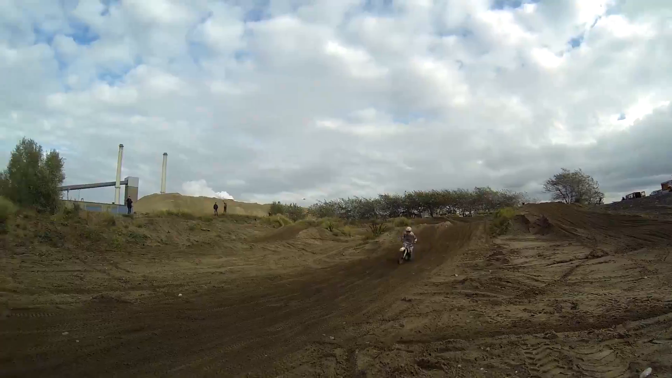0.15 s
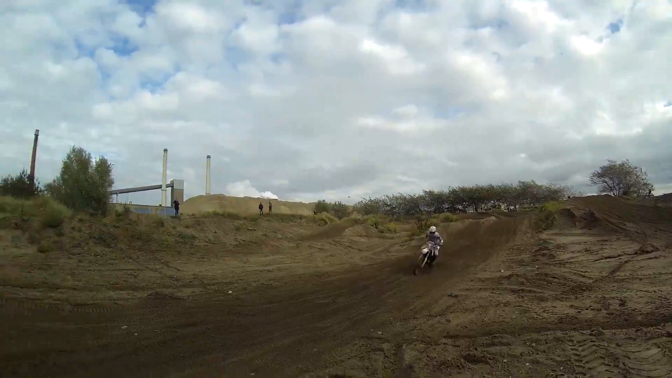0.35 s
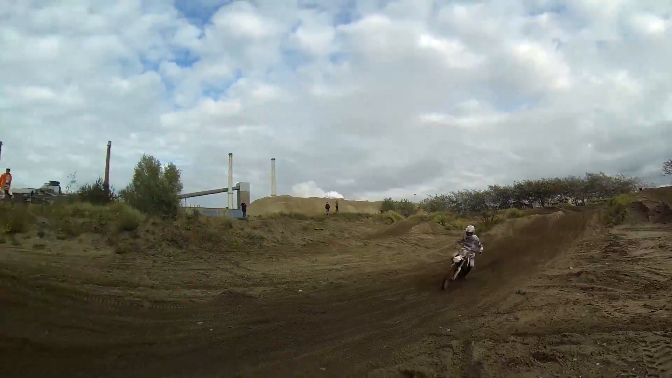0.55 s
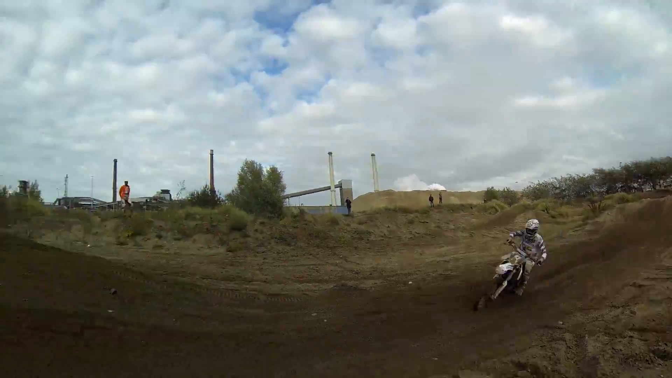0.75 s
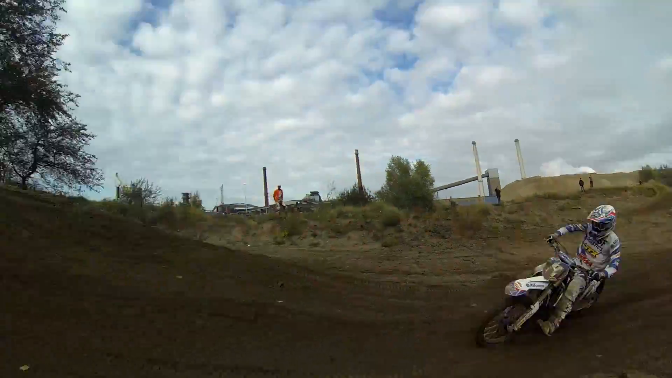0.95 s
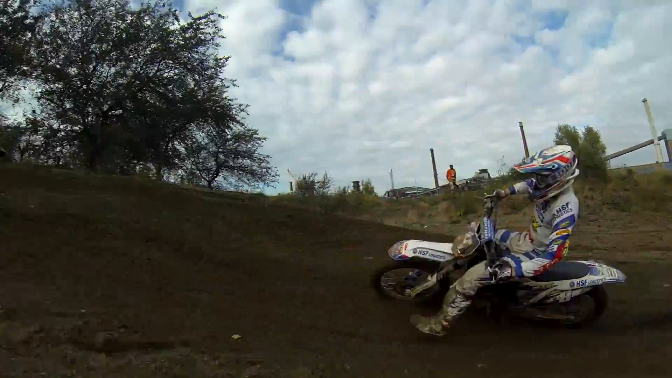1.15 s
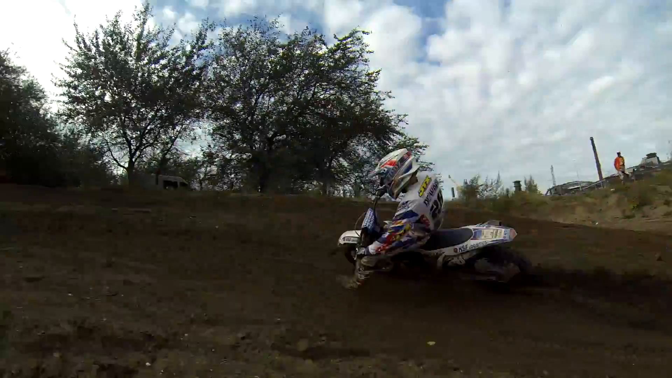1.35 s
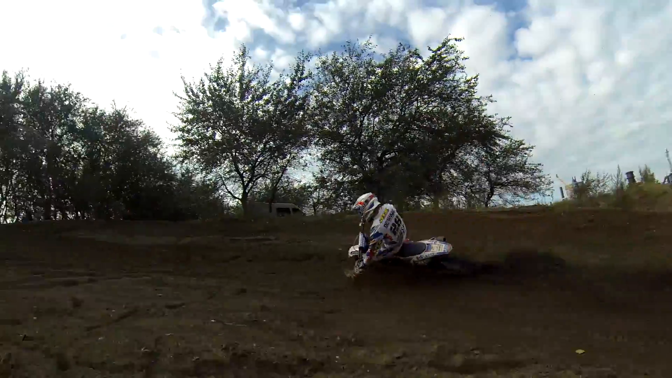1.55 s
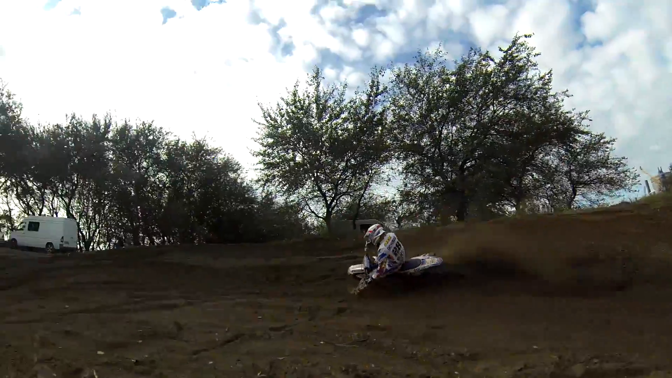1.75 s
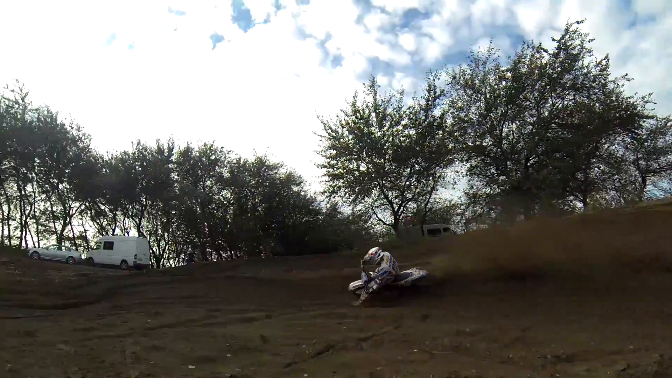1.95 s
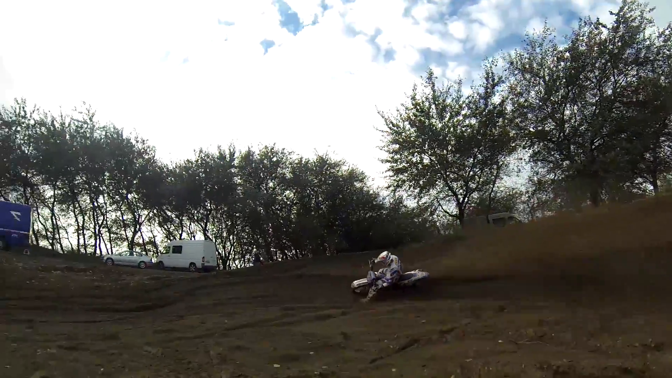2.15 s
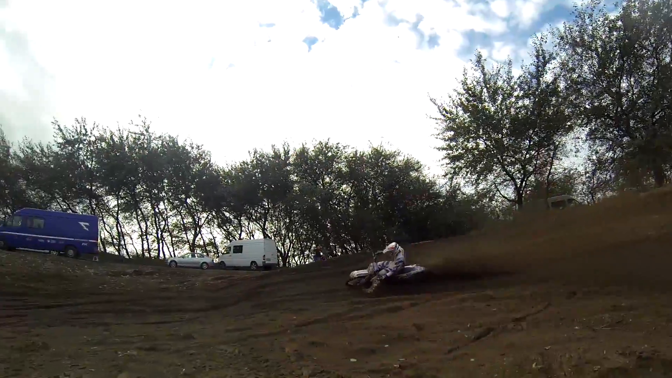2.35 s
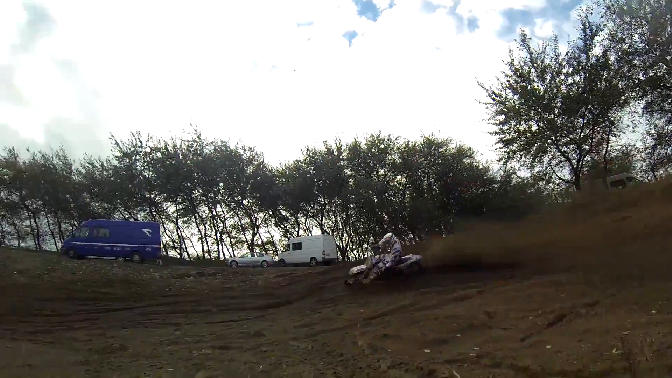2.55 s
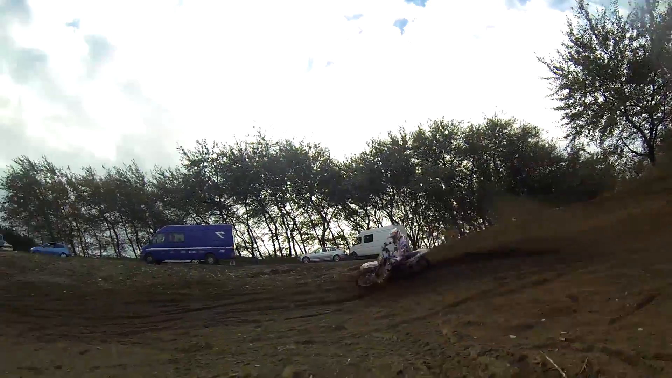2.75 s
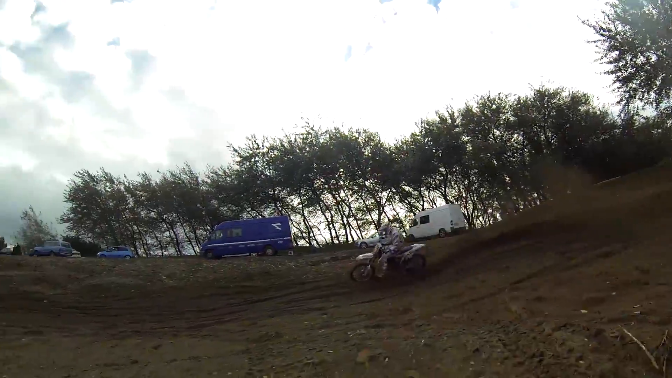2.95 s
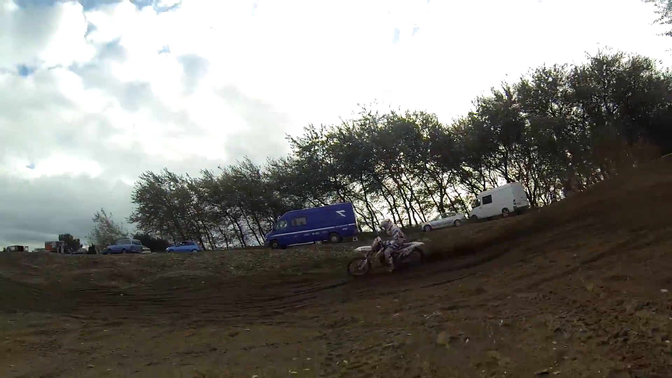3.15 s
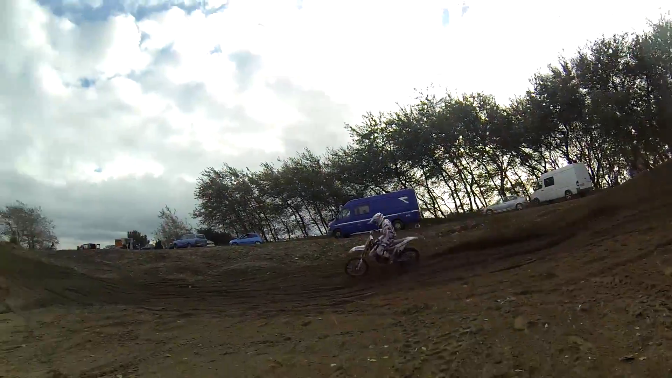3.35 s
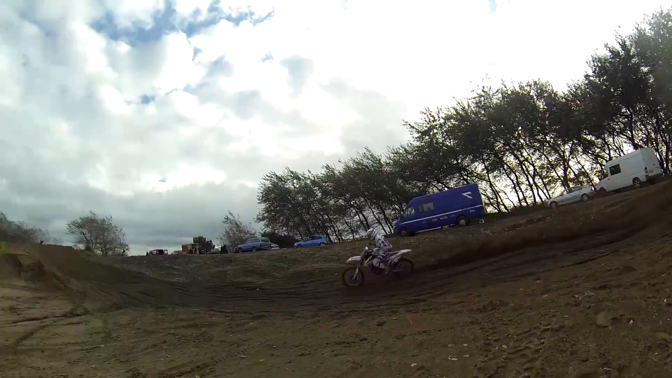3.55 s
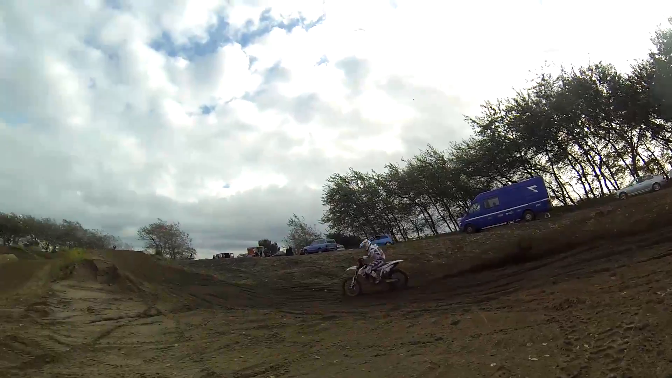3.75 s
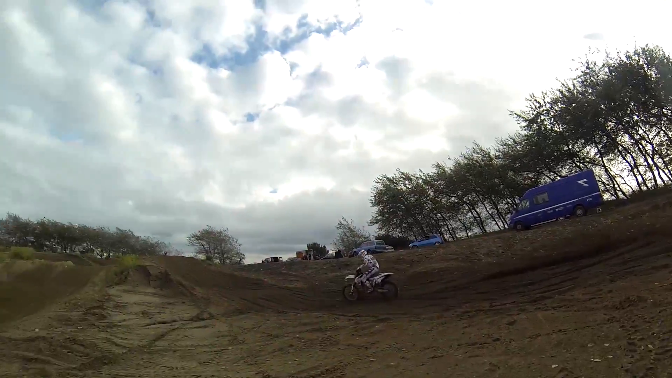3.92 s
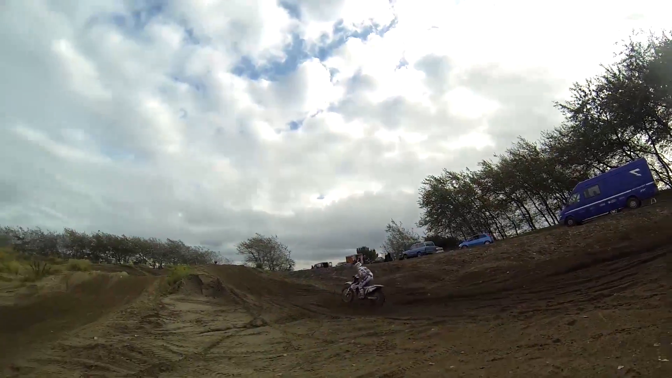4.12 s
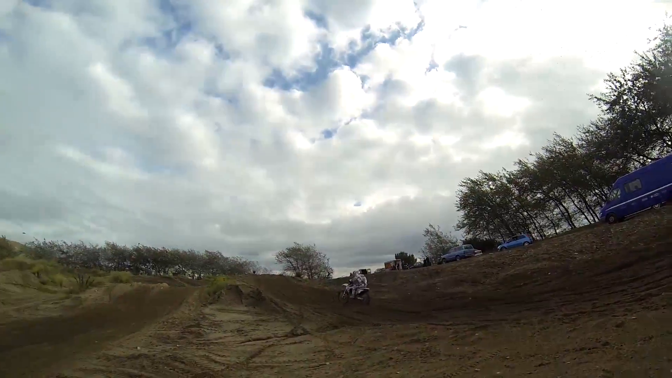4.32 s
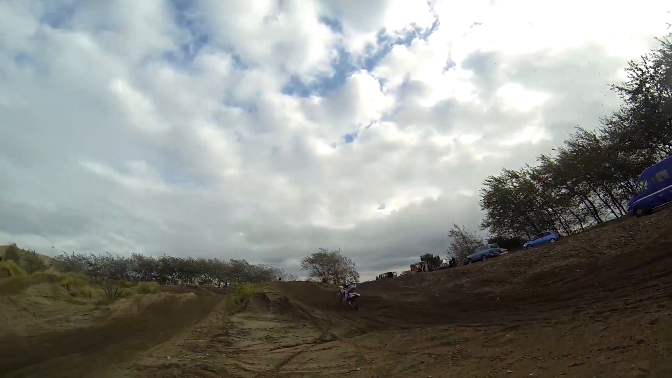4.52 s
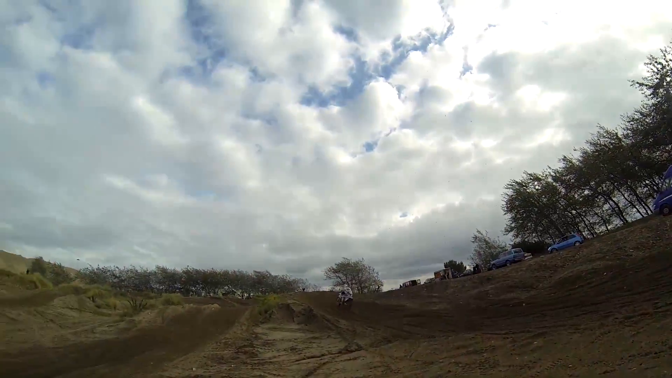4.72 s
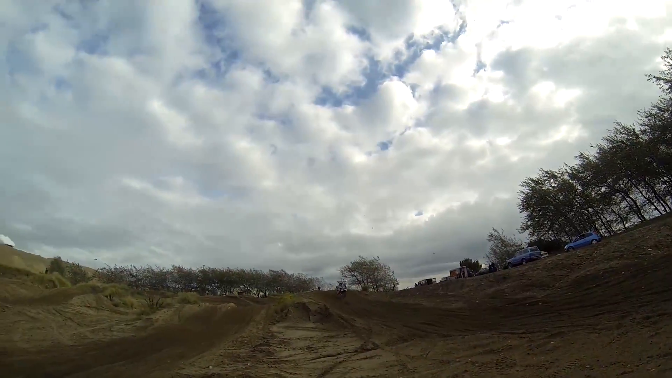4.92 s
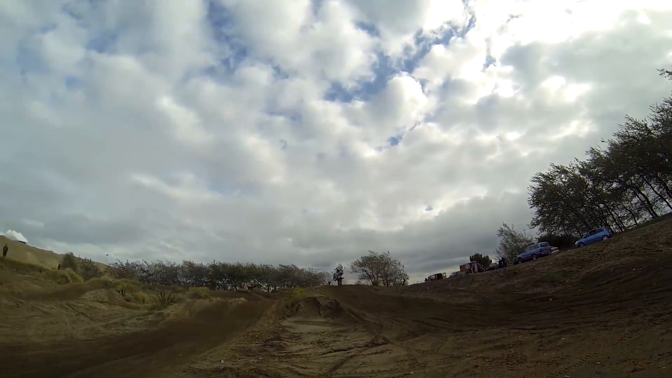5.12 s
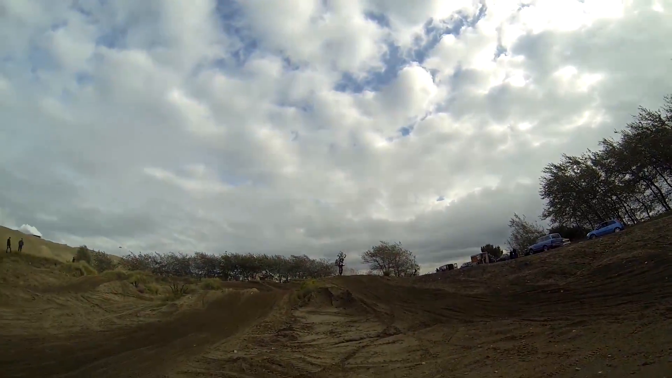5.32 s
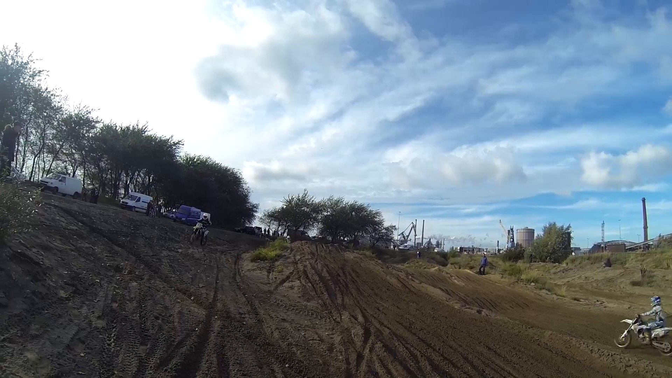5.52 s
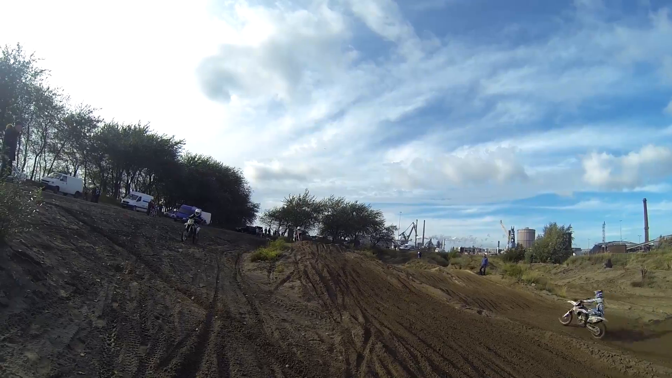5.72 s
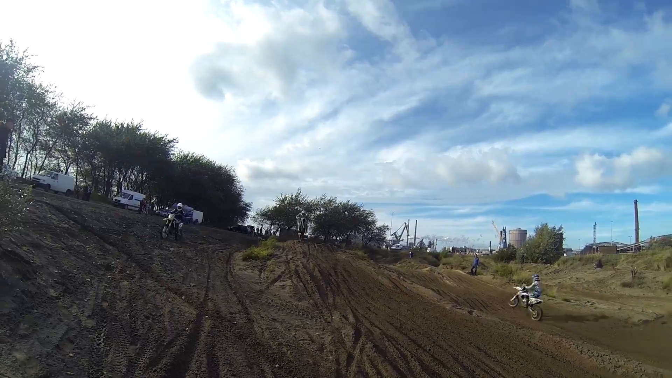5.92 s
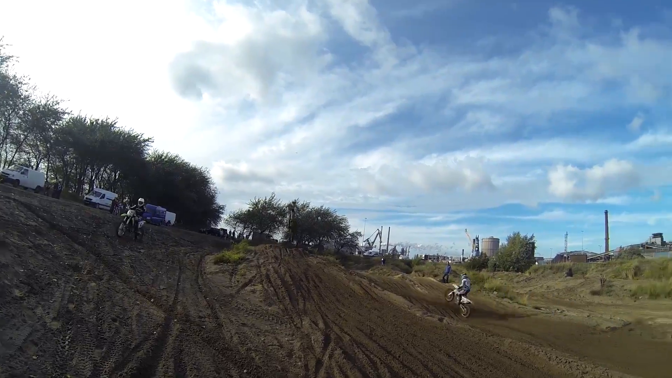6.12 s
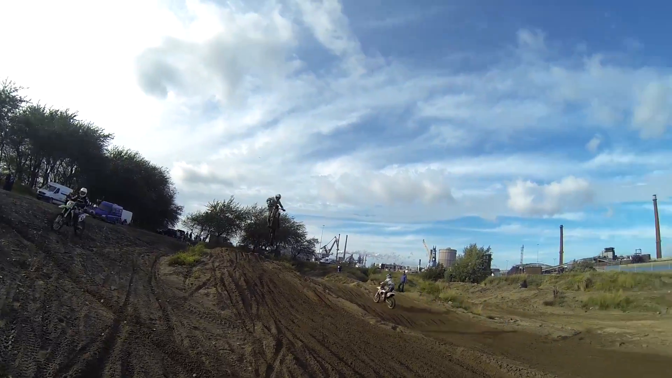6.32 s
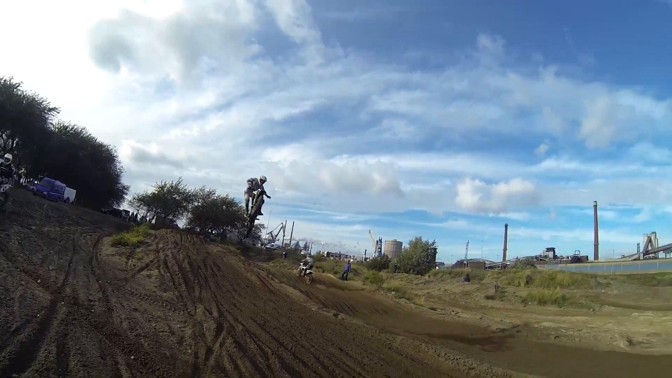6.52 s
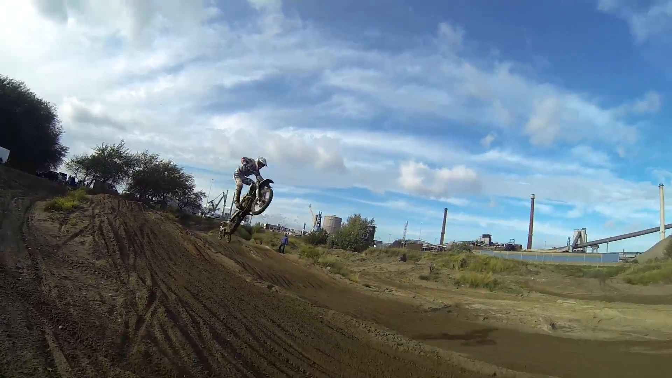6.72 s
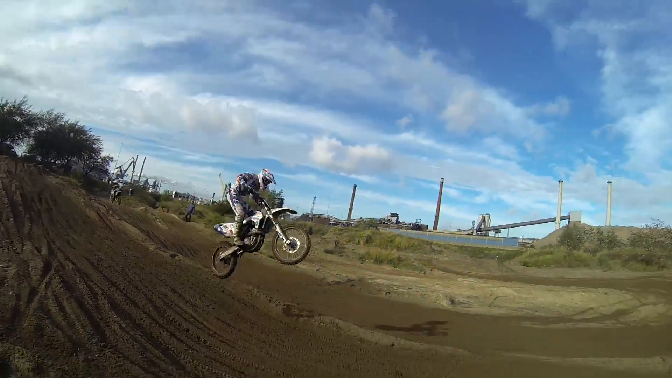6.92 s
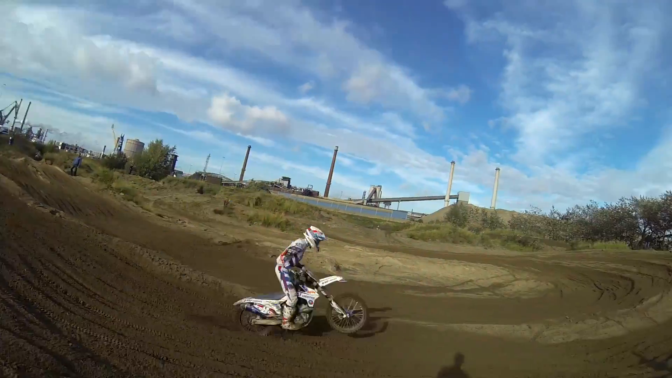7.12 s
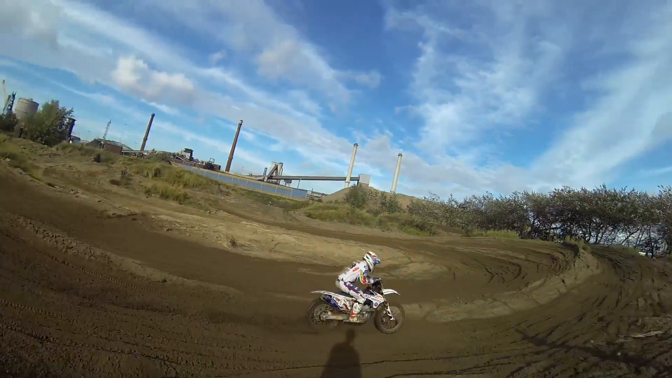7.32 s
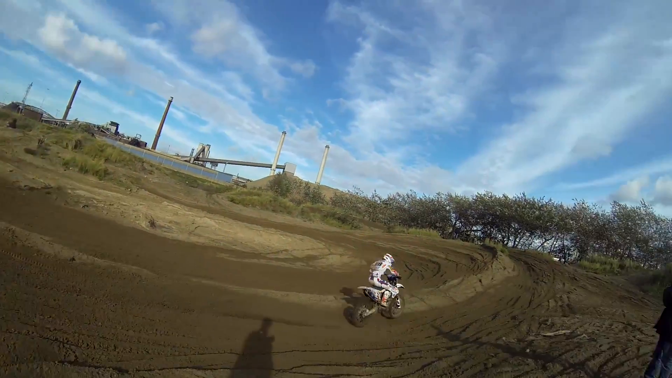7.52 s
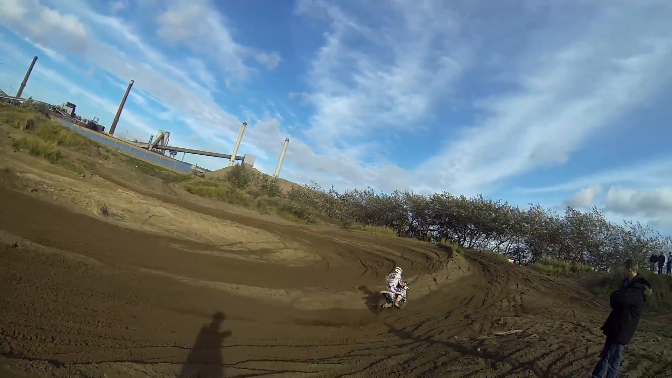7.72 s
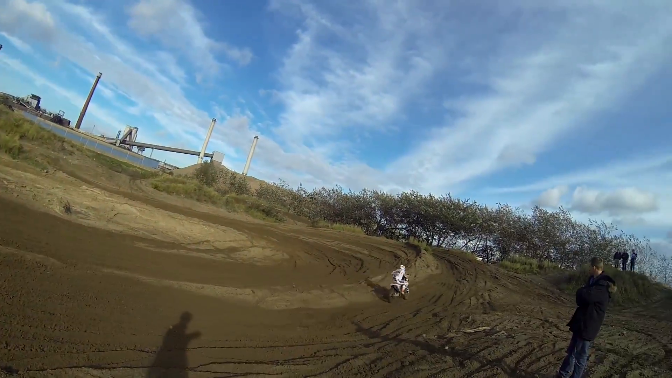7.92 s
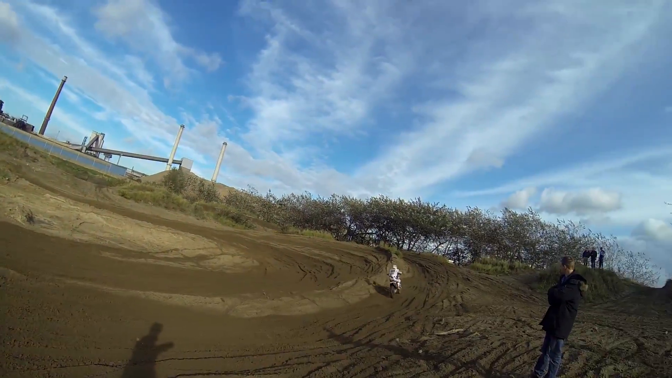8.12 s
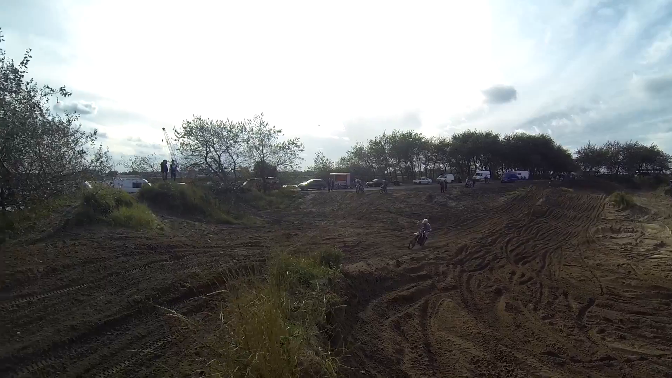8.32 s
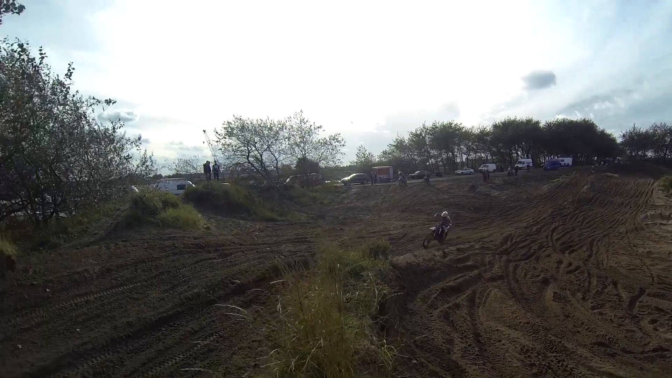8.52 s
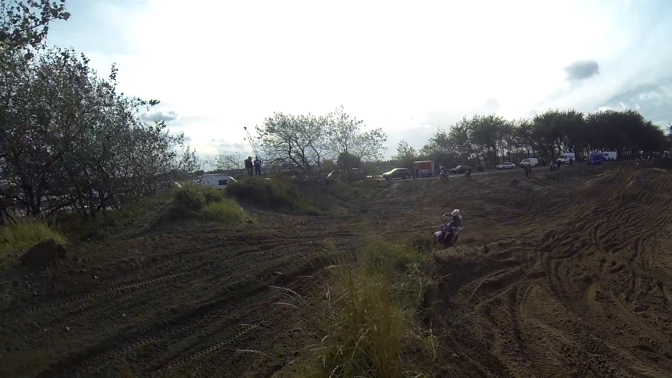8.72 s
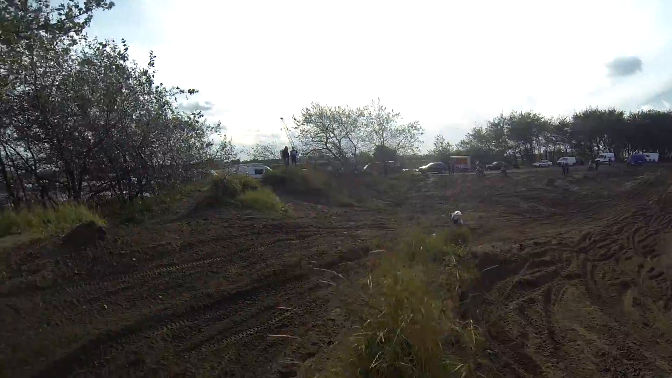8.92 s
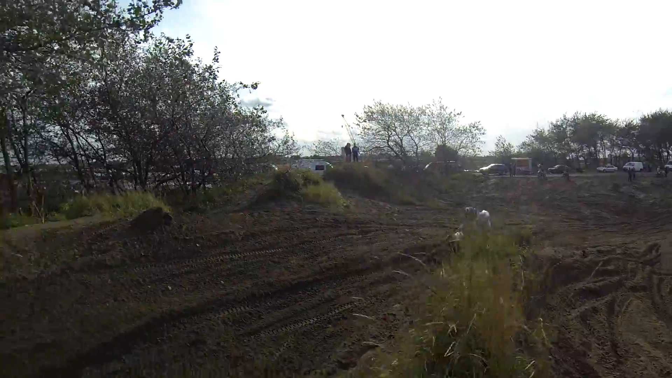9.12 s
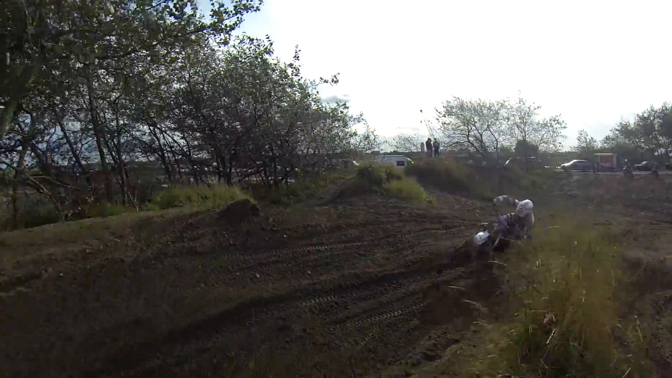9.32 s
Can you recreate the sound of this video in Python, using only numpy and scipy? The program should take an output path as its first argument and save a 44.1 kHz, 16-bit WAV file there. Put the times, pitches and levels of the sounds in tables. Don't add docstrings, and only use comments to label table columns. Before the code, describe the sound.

Outdoors on a sandy track, a single-cylinder dirt bike approaches buzzing, its revs sink for a corner, then it roars past close and pulls away with wavering rasp. After a tiny silence, a smaller, higher bike burbles off through hissing sand; another lands loudly, accelerates away and fades to a distant throb. Wind rumbles on the small, boxy-sounding microphone.

```python
import sys
import numpy as np
from scipy import signal
from scipy.io import wavfile
from scipy.ndimage import uniform_filter1d

SR = 44100
rng = np.random.default_rng(int(sys.argv[2]) if len(sys.argv) > 2 else 0)


def ratio(d):
    e = np.asarray(d, float) / 20
    return 10 ** e


def store_pcm(level_fs):
    pcm = np.round(np.clip(level_fs, -1, 1) * 32767).astype(np.int16)
    wavfile.write(sys.argv[1], SR, np.atleast_2d(pcm).T)


N = 412769

# f/Hz, level/dB
BRAKING_PIPE = [(35, -39), (60, -10), (192, -4), (299, 1.5), (590, -25), (1150, -9), (1500, -50),
                (2530, -120)]
PULLING_PIPE = [(35, -32), (60, -3.5), (281, -0.5), (484, -7.5), (866, -11.5), (1150, -2), (1500, -48),
                (2530, -120)]
SMALL_PIPE = [(65, -30), (110, -3), (189, 4), (305, -10.5), (475, -5.5), (739, -8.5), (848, -17), (1150, 2),
              (1500, -39), (2530, -120)]
JUMPING_PIPE = [(35, -33), (60, 2), (178, 2), (455, -6), (1150, -12), (1500, -44), (2530, -120)]
FAR_PIPE = [(29, -40), (50, 2), (147, 2.5), (210, -13), (279, -0.5), (372, 5), (672, -11.5), (932, -9),
            (1150, -4), (1500, -53), (2530, -120)]
LANDING_PIPE = [(35, -39), (60, -8), (125, -8.5), (240, -2.5), (365, 4), (590, -2), (1150, 5), (2530, -120)]
IDLING_PIPE = [(35, -33), (60, 3), (110, -2), (165, 6.5), (240, -13.5), (420, -12), (1150, -8),
               (2530, -120)]
TURNING_PIPE = [(35, -33), (60, -2.5), (281, 2), (370, -10.5), (484, -3.5), (800, -14), (1150, -18),
                (2530, -120)]
# start t/s, pipe colour, rumble share (0 = none), brightness above 5 kHz level/dB,
# throb centre f/Hz, dip of the lowest rasp mode level/dB
STRETCHES = [(0, BRAKING_PIPE, 0.22, 9, 232, 4), (0.78, IDLING_PIPE, 0.56, 9, 156.2, 6),
             (1.1, PULLING_PIPE, 0.44, 10, 205.9, -5), (1.27, PULLING_PIPE, 0.16, 8, 210, -0.5),
             (1.619, TURNING_PIPE, 0.047, 5.5, 237.2, 4), (1.948, TURNING_PIPE, 0.043, -1, 247.1, 7),
             (2.3, TURNING_PIPE, 0.046, 0.5, 250, 3), (2.7, PULLING_PIPE, 0.086, 2.5, 214.8, 2),
             (3.9, PULLING_PIPE, 0.082, -6, 194.7, -3), (4.53, PULLING_PIPE, 0.085, -2, 194.8, 0),
             (5.03, PULLING_PIPE, 0.091, -7, 191.4, -12), (5.265, IDLING_PIPE, 0.43, -6, 146.3, 1),
             (5.5, SMALL_PIPE, 0.8, 0, 179.7, -10.5), (6.15, SMALL_PIPE, 1.8, 7, 190.6, -7),
             (6.6, BRAKING_PIPE, 1.32, 9, 291.5, 0), (6.87, LANDING_PIPE, 0.34, 12.5, 315.2, -5.5),
             (7.21, JUMPING_PIPE, 0.27, 11, 174.9, -9.5), (8.001, JUMPING_PIPE, 0.35, 3, 174, -6.5),
             (8.28, JUMPING_PIPE, 1.2, 2, 165.9, -1), (8.366, IDLING_PIPE, 0.4, 2, 154.9, -10.5),
             (8.749, FAR_PIPE, 0.25, 1, 159.8, -10), (8.9, FAR_PIPE, 0.28, 5, 160.2, -5.5)]


def table(rows):
    s, *columns = np.transpose(rows)
    return [np.interp(np.arange(N) / SR, s, c) for c in columns]


def by_stretch(values):
    starts = [row[0] for row in STRETCHES]
    now = np.searchsorted(starts, np.arange(N) / SR, side="right") - 1
    return np.array(values)[now]


def swells(rows):
    t = np.arange(N) / SR
    total = 0
    for s, height, coming, going in rows:
        distance = np.maximum((s - t) / coming, (t - s) / going)
        total = total + height * np.cos(np.pi / 2 * np.clip(distance, 0, 1)) ** 2
    return total


def between(t0, t1, edge_s):
    t = np.arange(N) / SR
    return np.clip(np.minimum(t - t0, t1 - t) / edge_s, 0, 1)


def drift(rate):
    knots_per_s = 80
    knots = rng.standard_normal(int(N / SR * knots_per_s) + 2)
    slow = uniform_filter1d(knots, size=max(1, round(40 / rate)))
    return np.interp(np.arange(N) / SR * knots_per_s, np.arange(len(knots)), slow / slow.std())


def level(x, over_s=0.14):
    return x / np.sqrt(uniform_filter1d(x ** 2, size=int(over_s * SR)) + 1e-12)


def band(x, low_hz, high_hz, order=2):
    return signal.sosfilt(signal.butter(order, [low_hz, high_hz], "band", fs=SR, output="sos"), x)


def resonances(x, modes, wander_db):
    out = 0
    for k, (hz, width, db) in enumerate(modes):
        r = np.exp(-np.pi * width / SR)
        ring = signal.lfilter([1, 0, -1], [1, -2 * r * np.cos(2 * np.pi * hz / SR), r * r], x)
        gain = ratio(db + wander_db * min(1, 4500 / hz) * drift(3))
        out = out + (-1) ** k * gain * (1 - r * r) / 2 * ring
    return out


def wind():
    # peak t/s, level/dB, coming t/s, going t/s
    gusts = [
        (0, 6, .1, 0.27),
        (1.15, 22.5, 0.18, 0.55),
        (5.37, 6, 0.27, 0.26),
        (7.2, 5, .5, 0.23),
        (8.03, 10, 0.39, 0.72),
        (9.22, 14, 0.21, 0.51),
    ]
    steady_db = -50.5
    rumble = band(rng.standard_normal(N), 3.1, 45)
    return ratio(steady_db + swells(gusts) + 2.5 * drift(8)) * rumble / rumble.std()


def spray():
    # t/s, level/dB
    sand = [(5.535, -44), (5.707, -44), (5.785, -52), (5.85, -48.5), (6.13, -55), (6.2, -63), (6.6, -56.5),
            (6.85, -52), (6.92, -40), (7.1, -41), (7.25, -48)]
    modes = [(5360, 2200, 9), (8300, 1460, -2), (11300, 1000, -11), (13800, 900, -6)]   # f/Hz, width/Hz, level/dB
    hiss = resonances(rng.standard_normal(N), modes, wander_db=1.5)
    return ratio(table(sand)[0] + 2.0) * level(hiss) * between(5.5, 7.3, 0.023)


def engine_overtone():
    # t/s, f/Hz, level/dB
    hum = [
        (6.14, 444.3, -47),
        (6.454, 346, -39.5),
        (6.49, 334, -43),
        (6.54, 371.7, -40),
        (6.598, 423, -37),
        (6.71, 397.2, -32.5),
        (6.87, 348.4, -43),
    ]
    hz, db = table(hum)
    tone = np.sin(2 * np.pi * np.cumsum(hz) / SR)
    return np.sqrt(2) * ratio(db) * tone * between(hum[0][0], hum[-1][0], 0.022)


def riding():
    # t/s, firing rate f/Hz, throb level/dB, exhaust aim (blast over throb) level/dB
    nearing = [(0, 134, -20, -9), (.025, 120, -21, -4), (.033, 104, -34.5, -2), (.042, 128, -26.5, -11),
               (.134, 122, -29, -6.5), (.296, 95.4, -29, -8.5), (.432, 119, -26.5, -5),
               (.636, 95, -24.5, -7.5), (.755, 104, -22.5, -6.5), (.775, 100, -27, -8)]
    braking = [(.8, 92.7, -28, -8.5), (0.902, 72.46, -31, -10), (1.078, 49.86, -30.5, -14),
               (1.119, 51.6, -37, 2), (1.247, 63.93, -34.5, -1), (1.268, 68.02, -31, -1.5)]
    passing = [(1.3, 75.2, -18.5, 1), (1.394, 104.9, -19, 5), (1.448, 111.8, -18, 3.5),
               (1.509, 117.2, -17.5, 2.3), (1.545, 115.1, -19.5, 2.77), (1.62, 95.8, -20, 2.3)]
    pulling = [(1.67, 95.76, -18.5, -0.5), (1.899, 94.7, -22.5, 3.5), (2.4, 95, -21.5, -4.5),
               (2.699, 95.06, -23.5, 3.5), (3.0, 95.33, -25.5, 6), (3.6, 95.1, -24.5, 8.5),
               (3.899, 94.7, -24, 5), (4.6, 95.1, -23.5, 4.5), (5.0, 94.75, -26, 4.5)]
    cresting = [(5.245, 94.9, -27.5, -5.5), (5.27, 94.6, -36.5, -3), (5.33, 92.4, -40.5, -4),
                (5.381, 83.9, -41.5, -2), (5.5, 77.3, -44, -5)]
    small_burst = [(5.536, 202, -37.5, 6), (5.549, 199.7, -33, 6.5), (5.627, 180.2, -33, 6),
                   (5.719, 184.7, -32.5, 8), (5.88, 144, -32, -1), (6.019, 168.1, -31, 7.5),
                   (6.06, 188, -36, 18.5), (6.08, 198.2, -30, 13), (6.105, 210.6, -30.5, 14.5),
                   (6.129, 211.3, -31, 10), (6.14, 209.2, -36.5, -1)]
    small_fading = [(6.2, 161.2, -37, 7.5), (6.309, 123.6, -39.5, 5.7), (6.429, 157.6, -35, 4.2),
                    (6.549, 172.2, -32.5, 3.6), (6.59, 165.4, -32, 0.91)]
    landing = [(6.601, 104.4, -34.5, -3.5), (6.711, 100.4, -36, 0), (6.84, 87.5, -35.5, -2),
               (6.899, 101, -24, 1.5), (7.0, 119, -21.5, 3.5), (7.16, 122.4, -16.5, -1.5),
               (7.21, 104.2, -17.5, 0.5), (7.27, 77.57, -19.5, 4.5)]
    leaving = [(7.33, 86.05, -18.5, 3.5), (7.43, 89.87, -21, 6), (7.56, 111.2, -19, 5.5),
               (7.65, 118.9, -20, 6), (7.8, 94.3, -24, 6.5), (7.95, 82.55, -20.5, -1),
               (8.081, 90.7, -24, 2.5), (8.201, 106.3, -23.5, -2), (8.265, 94.4, -28.5, 0.5)]
    coasting = [(8.29, 89.9, -34, 2), (8.35, 84.7, -37, 1.5), (8.38, 83.5, -40.5, 0),
                (8.599, 80.2, -40, -6.5), (8.74, 65.7, -41.5, -6)]
    far_bike = [(8.75, 45.78, -42.5, 4), (8.817, 48.97, -37, 0), (8.908, 67.05, -43, 0.5),
                (8.954, 71.8, -39, -2.5), (9.068, 72.4, -36, -2.5), (9.152, 67.7, -36, -3),
                (9.297, 65.2, -38.5, 0.5), (9.36, 59.25, -29.5, -7)]
    # peak t/s, firing rate gained f/Hz, coming t/s, going t/s
    grip = [(.19, -6, 0.033, .09), (.49, -6, 0.047, 0.04), (1.822, -9.5, 0.3, 0.097),
            (2.01, -4.5, 0.075, 0.17), (2.457, -24.5, .385, 0.48), (2.934, -9, 0.13, 0.11),
            (3.05, 2.5, 0.048, 0.059), (3.275, -20.5, 0.19, 0.16), (3.747, -10, 0.14, 0.11),
            (4.03, 5, 0.22, 0.078), (4.145, 10, 0.071, 0.097), (4.22, -4, 0.041, 0.072),
            (4.346, -13, 0.056, 0.17), (4.611, 15.5, .16, 0.14), (4.82, -14.5, 0.14, 0.086),
            (4.93, 2.5, 0.034, 0.047), (5.046, -4, 0.048, 0.094), (5.255, 12, 0.12, 0.078),
            (5.78, -7, 0.044, 0.04), (5.835, 5, 0.029, 0.033), (7.86, 4, 0.052, 0.054)]
    flywheel_s = .04
    rate, throb_db, aim_db = table(np.vstack([nearing, braking, passing, pulling, cresting, small_burst,
                                              small_fading, landing, leaving, coasting, far_bike]))
    rate = uniform_filter1d(rate, size=int(flywheel_s * SR)) + swells(grip)
    return rate, throb_db, aim_db


def orders(turns, rate, centre, strength, rumble_share):
    throb_width_octaves = 1.51
    throb, growl = np.zeros(N), np.zeros(N)
    cuts = [round(row[0] * SR) for row in STRETCHES] + [N]
    for order in range(1, 21):
        hz = order * rate
        colour = []
        for a, b, row in zip(cuts, cuts[1:], STRETCHES):
            pipe_hz, pipe_db = np.transpose(row[1])
            colour.append(np.interp(np.log(hz[a:b]), np.log(pipe_hz), pipe_db))
        low = np.clip((430 - hz) / 60, 0, 1)
        db = np.concatenate(colour) + (1.6 + 2.4 * (1 - low)) * drift(4)
        lag = low * hz * 0.00568
        phase = 2 * np.pi * (order * turns - lag) + .4 * rng.standard_normal() - .15 * order
        tone = -ratio(db) * np.cos(phase)
        growl += (1 - low) * tone * np.clip((1150 - hz) / 150, 0, 1)
        if low.any():
            hump = np.exp(-.5 * (np.log2(hz / centre) / throb_width_octaves) ** 2)
            throb += low * tone * hump / np.sqrt(1 + (hz / 345) ** 16)
    rumble = level(band(rng.standard_normal(N), 86, 232))
    throb = level(level(throb) + rumble_share * rumble)
    return throb, level(growl * uniform_filter1d(strength, size=120))


def blasts(turns, strength, ragged, swell_ms, fade_ms, click):
    # delay t/ms, gain (1 = as loud)
    echoes = [
        (3.7, 0.77),
        (7.9, 0.39),
    ]
    fired = strength * (np.diff(np.floor(turns), prepend=0) > 0)
    ms = np.arange(500) / SR * 1000
    shape = (1 - np.exp(-ms / swell_ms)) ** 2 * np.exp(-ms / fade_ms)
    puffs = rng.standard_normal((3, 500)) * shape / np.linalg.norm(shape)
    puffs[0, np.argmax(shape)] -= click
    same = sum(signal.oaconvolve(fired * (1 + .5 * drift(2)), puff)[:N] for puff in puffs)
    echoed = sum(gain * np.roll(same, int(lag_ms * SR / 1000)) for lag_ms, gain in echoes)
    same = same + ragged * echoed
    fresh = signal.oaconvolve(fired, shape)[:N] * rng.standard_normal(N)
    steady = rng.standard_normal(N)
    fresh = level(level(fresh) + 2.6 * ragged * steady)
    return np.sqrt(1 - ragged) * level(same), np.sqrt(ragged) * fresh


def bursts(turns, rate, strength, hz, swell_ms):
    pitch_scatter = .012
    firing, out = turns.astype(int), 0
    starts = np.searchsorted(firing, np.arange(firing[-1] + 1))
    pitch = hz[starts] * (1 + pitch_scatter * rng.standard_normal(1200)[:len(starts)])
    late = turns[starts] % 1 / rate[starts]
    for back in range(2):
        k = np.maximum(firing - back, 0)
        age = (np.arange(N) - starts[k]) / SR + late[k]
        swell = (age * 1000) ** 4 * np.exp(-age * 1000 / swell_ms)
        out = out - strength[starts][k] * swell * np.sin(2 * np.pi * pitch[k] * age)
    return level(out)


def bark_modes(turns, rate, strength, ragged, fresh):
    # t/s, centre f/Hz, spread f/Hz, upper modes level/dB
    bearing = [(0.0, 1363, 119, -9), (0.63, 1397, 118, -5), (0.73, 1390, 117, -1), (1.27, 1510, 150.1, -3),
               (1.4, 1390, 139.8, -9.5), (1.62, 1390, 130, -5.5), (1.75, 1355, 110, -9.5),
               (2.11, 1330, 109.8, -5), (2.28, 1360, 119.9, -1), (2.42, 1320, 109, 4),
               (2.58, 1322, 110.6, -14), (3.2, 1359, 109.6, -10.5), (3.6, 1361, 109.8, -9),
               (4.0, 1343, 109.9, -8.5), (4.6, 1361, 110.3, -14.5), (5.37, 1349, 120, -17),
               (5.55, 1418, 120, -8), (5.78, 1500, 122, -4), (6.1, 1472, 122.1, -19),
               (6.57, 1421, 121.1, -14), (6.67, 1543, 120, -14), (6.8, 1441, 123, -17),
               (7.1, 1430, 130.2, -14), (7.32, 1493, 109.8, -12), (7.7, 1453, 110, -26),
               (8.26, 1387, 121.1, -12), (8.45, 1506, 119.6, -15), (8.65, 1420, 120.6, -9),
               (9.36, 1413, 120.3, -12)]
    # f/Hz, width f/Hz, level/dB
    upper_bark = [
        (1700, 170, -3.5),
        (1620, 140, -31),
    ]
    bark_hz = [1298, 1320, 1390, 1452, 1470, 1613]
    bark_width_hz, upper_hz = 82, 1681
    burst_ms, upper_burst_ms = 1.0, .85
    after_ms, after_gain = 4.99, 0.13
    centre, spread, upper_db = table(bearing)
    clean = bursts(turns, rate, strength, centre, burst_ms)
    upper = bursts(turns, rate, strength, np.full(N, upper_hz), upper_burst_ms)
    clean = clean + ratio(upper_db) * upper
    clean = level(clean + after_gain * np.roll(clean, int(after_ms * SR / 1000)))
    low = 0
    for k, hz in enumerate(bark_hz):
        ring = resonances(fresh, [(hz, bark_width_hz, 0)], wander_db=1.5)
        low = low + (-1) ** k * np.exp(-.5 * ((hz - centre) / spread) ** 2) * ring
    stirred = level(low + ratio(upper_db) * resonances(fresh, upper_bark, wander_db=5.0))
    return level(band(np.sqrt(1 - ragged) * clean + ragged * stirred, 1175, 1760, order=3))


def rasp_modes(turns, rate, strength, ragged, bright_db, deep_db):
    # f/Hz, width f/Hz, level/dB
    case_modes = [(2189, 154, 10), (2800, 398, 6), (2890, 112, 10.5), (3330, 223, 10.5), (3673, 237, 8.5),
                  (4350, 620, -11), (4893, 215, 0), (5610, 460, -7), (6210, 780, -8), (7080, 410, -18.5),
                  (7420, 210, -17.5), (9400, 200, -20.5), (10560, 270, -19.5), (12200, 6100, -28.5)]
    # f/Hz, width f/Hz, level/dB
    side_modes = [(2014, 126, 0)], [(3590, 260, 0)]
    # t/s, lower mode level/dB, upper mode level/dB (over the rasp)
    flank = [(0, -7, -24), (.7, -2.5, -17), (1.2, -2, -21), (1.6, -8, -3.5), (2.2, -6, -5), (2.5, -5, -8.5),
             (3.4, -3.5, -11), (3.9, -7.5, -19), (4.4, -5, -21), (4.6, -7.5, -13), (5.2, -8, -24),
             (5.6, -15, -22), (6.1, -12, -15), (6.3, -19, -18), (7.0, -5, -8), (7.4, -22, -10),
             (8.2, -20, -11), (9.36, -12, -18)]
    crack_rise_ms, crack_ms = .6, 2.3
    whine_hz, whine_db, whine_ms = 2273, -7, 0.41
    same, fresh = blasts(turns, strength, ragged, crack_rise_ms, crack_ms, click=0.16)
    puff = .85 * band(same, 1000, 5200) + 1.1 * fresh
    lowest = ratio(-.95 * deep_db) * resonances(puff, case_modes[:1], wander_db=3.0)
    rasp = lowest - resonances(puff, case_modes[1:], wander_db=2.0)
    leak = band(np.roll(fresh, shift=50), 4000, 6800)
    rasp = band(rasp, 1450, 20000) + ratio(-19) * leak
    rasp = level(rasp + (ratio(bright_db) - 1) * band(rasp, 5100, 13600, order=1))
    whine = bursts(turns, rate, strength, np.full(N, whine_hz), whine_ms)
    rasp = rasp + ratio(whine_db - 0.58 * deep_db) * (1 - ragged) ** 2 * whine
    for db, mode in zip(table(flank), side_modes):
        rasp = rasp + ratio(db) * level(resonances(puff, mode, wander_db=4.0))
    return rasp


def engines():
    # from t/s, to t/s, depth level/dB
    misfires = [
        (1.461, 1.498, -7.5),
        (1.526, 1.558, -6.5),
        (7.07, 7.098, -4.5),
        (7.148, 7.198, -3.5),
        (7.592, 7.622, -8),
        (7.641, 7.716, -5),
        (8.36, 8.408, -4.5),
    ]
    # peak t/s, level/dB, coming t/s, going t/s
    surges = [(1.336, 2, 0.037, 0.038), (2.08, -2, 0.04, .05), (2.24, 2, 0.066, .06),
              (2.68, 1, 0.052, 0.084), (3.5, 2, 0.098, 0.097), (4.35, 2.5, 0.048, 0.072),
              (4.495, 7.5, 0.041, 0.023), (4.58, -1, 0.049, .05), (4.66, 4, .04, .05),
              (4.74, -3, .03, 0.065), (4.86, 1.5, 0.039, .05), (5.7, 2.5, 0.033, .05),
              (5.95, 4.5, 0.035, .04), (7.3, -3, 0.041, 0.042), (7.74, 5, 0.029, .03),
              (7.83, 3.5, 0.058, 0.069), (8.82, 0, 0.071, 0.044)]
    # growl level/dB, rasp level/dB
    blend = [(-12.5, -9), (-17.5, -10.5), (-2.5, -6), (-3, -6), (-6, -5.5), (-7, -6.5), (-11, -9.5),
             (-9.5, -8.5), (-10, -5.5), (-11, -7.5), (-5.5, -9.5), (-12, -7.5), (-2, -5.5), (-3.5, -7),
             (-8.5, -6), (-6.5, -7.5), (-3, -9.5), (-4.5, -9.5), (-11.5, -9.5), (-19.5, -11), (-7.5, -6),
             (-7.5, -7)]
    raggedness = [.38, .85, .5, .3, .23, .24, .28, .32, .32, .34, .36, .9, .24, .44, .9, .46, .29, .33, .85,
                  .85, .36, .6]
    swell_ms, ring_ms = 1.9, 1.2
    growl_follows_aim, rasp_follows_aim = 0.12, 0.44
    rate, throb_db, aim_db = riding()
    rumble_share, bright_db, centre, deep_db = by_stretch([row[2:] for row in STRETCHES]).T
    growl_db, rasp_db = by_stretch(blend).T
    growl_db = growl_db + throb_db + growl_follows_aim * aim_db
    rasp_db = rasp_db + throb_db + rasp_follows_aim * aim_db
    bark_db = throb_db + aim_db + swells(surges)
    cut_db = sum(db * between(t0, t1, 0.00097) for t0, t1, db in misfires)
    ragged = np.clip(by_stretch(raggedness) - 0.016 * cut_db, .02, .98)
    turns = np.cumsum(rate * (1 + .003 * drift(30))) / SR
    strength = ratio(1.24 * rng.standard_normal(1200)[turns.astype(int)])
    throb, growl = orders(turns, rate, centre, strength, rumble_share)
    _, fresh = blasts(turns, strength, ragged, swell_ms, ring_ms, click=2.16)
    breath = level(band(fresh, 380, 1200))
    growl = level(np.sqrt(1 - ragged) * growl + .7 * ragged * breath)
    bark = bark_modes(turns, rate, strength, ragged, fresh)
    rasp = rasp_modes(turns, rate, strength, ragged, bright_db, deep_db)
    mix = ratio(throb_db) * throb + ratio(growl_db) * growl + ratio(bark_db) * bark + ratio(rasp_db) * rasp
    return ratio(cut_db) * mix


def scene():
    return (wind() + spray() + engine_overtone() + engines())[None]


def band_limit(x):
    return signal.sosfilt(signal.butter(12, 15520, fs=SR, output="sos"), x)


def record(dry):
    x = signal.sosfilt(signal.cheby2(10, 50, 15650, fs=SR, output="sos"), dry)
    silence = between(5.493, 5.535, 0.0024)
    x = 1.073 * np.tanh(x / 1.14) * (1 - silence)
    return band_limit(x)


dry = scene()
out = record(dry)
store_pcm(out)
```